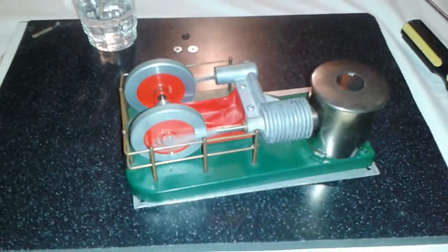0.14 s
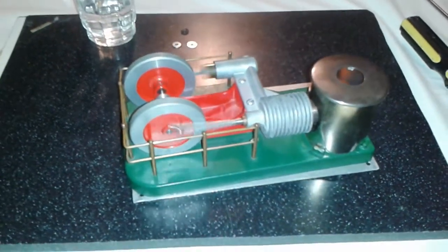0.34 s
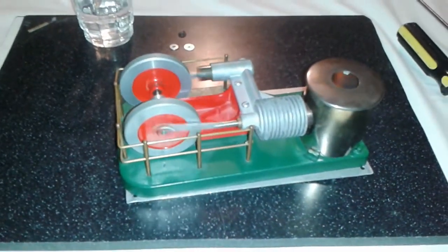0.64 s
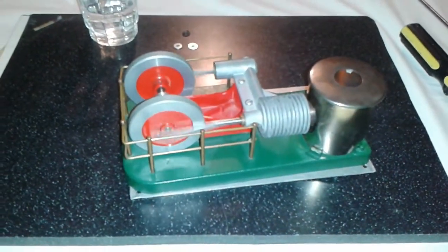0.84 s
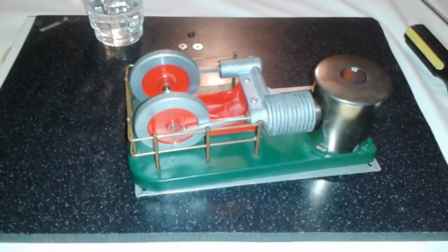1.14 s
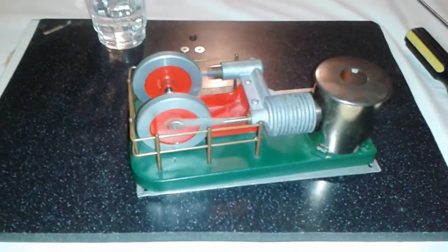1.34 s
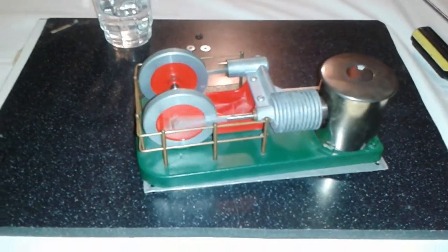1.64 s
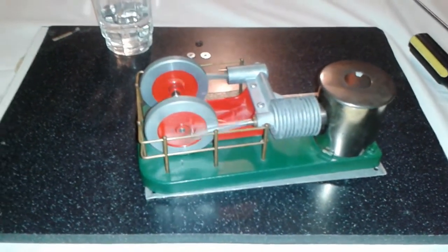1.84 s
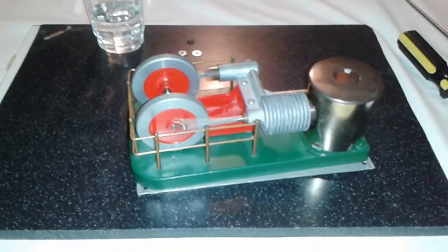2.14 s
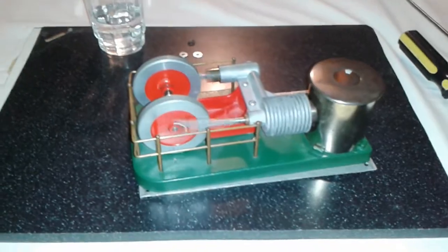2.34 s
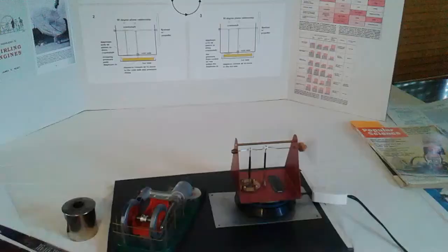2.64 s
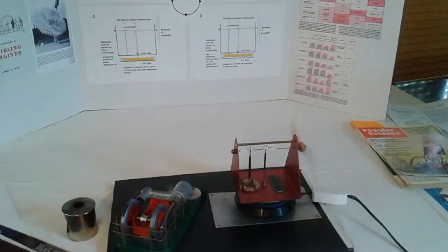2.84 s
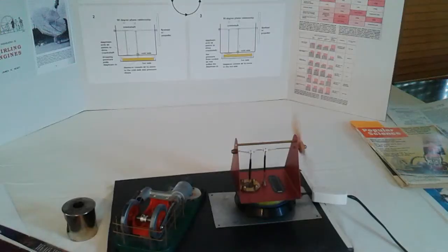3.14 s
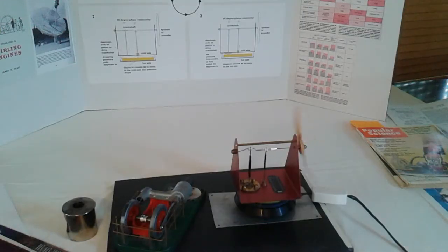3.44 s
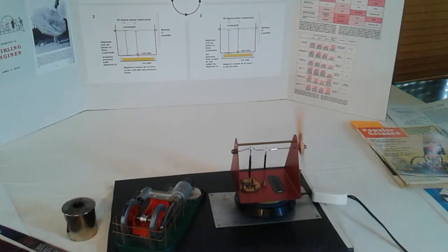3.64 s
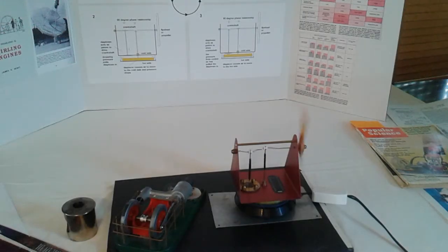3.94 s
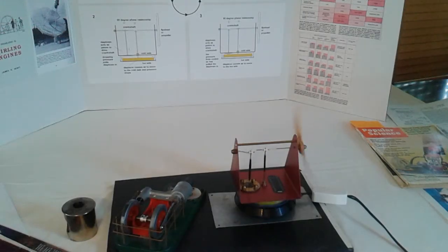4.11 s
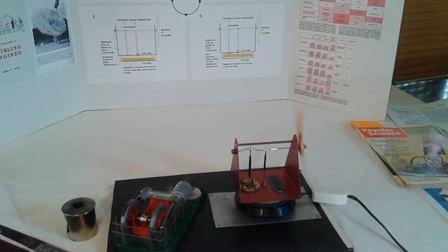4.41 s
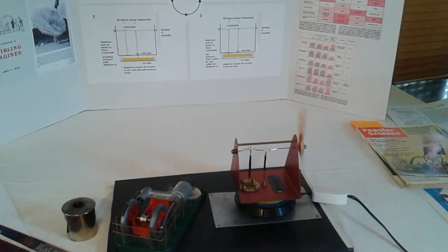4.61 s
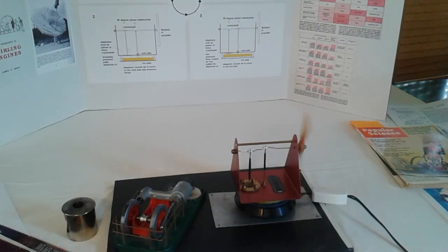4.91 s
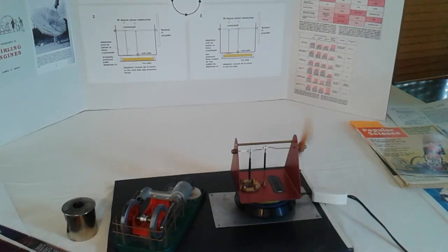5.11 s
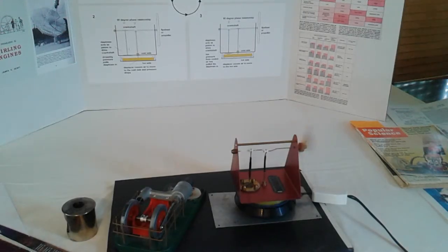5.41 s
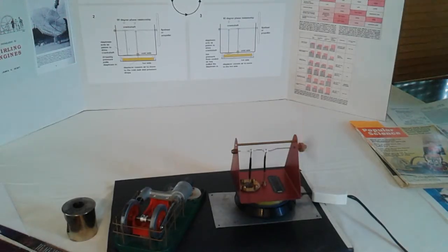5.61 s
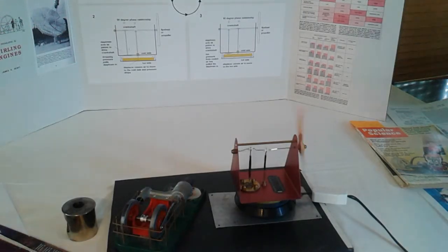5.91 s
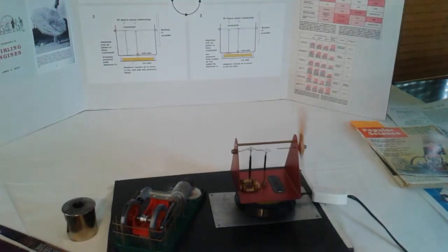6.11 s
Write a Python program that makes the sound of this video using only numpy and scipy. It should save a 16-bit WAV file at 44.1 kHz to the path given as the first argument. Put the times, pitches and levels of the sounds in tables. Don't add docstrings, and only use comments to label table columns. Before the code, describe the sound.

A small hot-air engine runs right beside a handheld camera, its slack metal links making a fast, dry, even clatter over boomy room noise. It cuts off abruptly into brief total silence. Then a toy motor with a spinning rotor rattles a little farther away, slower, looser and scratchier, over softer hiss, with faint hand bumps on the camera.

```python
import sys
import numpy as np
from scipy import signal
from scipy.io import wavfile
from scipy.ndimage import uniform_filter1d

SR = 44100
rng = np.random.default_rng(int(sys.argv[2]) if len(sys.argv) > 2 else 0)


def file_out(sig):
    cols = np.atleast_2d(sig).T
    lim = np.clip(cols, -1, 1)
    pcm = np.round(lim * 32767).astype(np.int16)
    wavfile.write(sys.argv[1], SR, pcm)


def linear_from_db(decibels):
    return 10 ** (np.asarray(decibels, float) / 20)


N = 276063
CUT_S = 3.0

# ring time t60 in seconds, left over right in dB.
ENGINE_MODES = [(0.039, 3.5), (0.074, 2.5), (0.047, -4.5), (0.051, 2), (0.01, -3.5), (0.0045, 7),
                (0.022, -12), (0.024, 5), (0.0099, 6), (0.01, -4.5), (0.0045, -4.5), (0.012, 7.5),
                (0.0034, 5), (0.056, -4.5), (0.0025, 7), (0.011, 11), (0.0058, 14.5), (0.0027, 14),
                (0.0032, 12), (0.0029, -4), (0.067, 2.2), (0.022, 4.5), (0.0065, 8.5)]
ENGINE_HZ = [460, 600, 660, 740, 920, 1300, 1630, 1950, 2520, 2860, 3650, 4650, 5600, 6110, 6800, 7910,
             8620, 9350, 10200, 11300, 12500, 13300, 14400]
ENGINE_LEAD = [0, 0, 0, 0, 0, .2, .2, .1, .3, .5, -2.5, .4, 1.2, -1.5, 1.5, 1.4, 2.8, -1.5, .3, -.5, -.3, 1,
               1.5]
ENGINE_RINGS = [
    [-28.5, -7.5, -9.5, -6, -5, 3.5, -16, 2, -8, -12.5, -2, -37.5, -15, -22, 10.5, -1.5, 6.5, -10.5, -22,
     -37.5, -35, -36, -27],
    [-27, -13.5, -21.5, -16, 1.5, 2.9, -8, -4, 4.5, -0.5, 1, -18, 1.5, -20.5, 4.5, -8, -1, 4, 2.5, -34,
     -28.5, -27.5, -17],
    [-4.5, -23.5, -5.5, -11.5, -9, -7, -21, -41, -27.5, -2, -21.5, -22, -18, -16, -30, -8.5, -4.5, -19.5,
     -14.5, -24, -32.5, -34.5, -25],
    [-12, -11, -6.5, -6.5, 0, 5.5, -3, 6.5, -16.5, -20.5, -10.5, -24, -20.5, -27, 0.5, -21, 3.5, -32.5, -15,
     -25, -37.5, -30, -22],
    [-17.5, -18, -5, -11, -2, -10.5, -15, -3, -1.5, 1, 1, -5.5, -7.5, -0.5, -0.5, -7, -42, -31, -21, -20.5,
     -35.5, -34.5, -32],
]
# length in seconds, decay in dB, first blow in dB, share of it spent rising.
ENGINE_CHATTER = [
    (.004, 8, -2, .4),
    (.0022, 14, 1, .3),
    (.004, 16, 5, .15),
    (.0035, 12, 2, .25),
    (.005, 12, 4, .15),
]
# turns done, time in seconds.
FLYWHEEL = [(-1, -.0226), (10, .8297), (20, 1.6043), (25, 1.9924), (30, 2.381), (35, 2.7704)]
# lag in the turn in seconds, treble blow in dB, its spread in dB,
# base-plate blow in dB, its spread in dB.
ENGINE_KNOCKS = [
    (0.0001, -25, -4, -24, 1.4),
    (.0061, -8.5, -0.14, -26, 1.6),
    (.0137, -11, 1.8, -32, 2.5),
    (.0335, -9.5, 1.24, -29, -1.4),
    (0.0539, -35, 7, -33, 1.5),
]
# time in seconds, extra level in dB.
ENGINE_ODD = [(.1474, 4), (.2099, 0), (0.3017, 10.5), (0.3386, 5), (.4173, 1.5), (0.4428, 6.5),
              (.5331, 3.5), (.6106, 5), (.688, 5), (.7087, -6.5), (.7262, 5.5), (.8297, -1.5),
              (0.9202, -1.5), (1.1526, 6), (1.2928, 6), (1.3079, 2), (1.0755, 1), (1.385, 8), (1.6957, 4.5),
              (1.849, -1), (1.9143, 3.5), (2.0075, -3), (2.1612, 2.5), (2.1998, 2), (2.318, 6.5),
              (2.4735, -2), (2.5502, 2)]
# time in seconds, level in dB.
ENGINE_DRIVE = [
    (0, 1.5),
    (1.4, 2.23),
    (2.8, 2.86),
]


def engine():
    span = (0, CUT_S)
    knocks = knocks_of(FLYWHEEL, ENGINE_KNOCKS, ENGINE_ODD, ENGINE_DRIVE, slack_s=.0003, span=span)
    return linear_from_db(1.5) * clatter(
        knocks, ENGINE_HZ, ENGINE_MODES, ENGINE_LEAD, ENGINE_RINGS, ENGINE_CHATTER,
        count=10, alike=.96, apart_hz=12000, rub_db=-60.0, rub_tilt_db=4.5, span=span,
        uneven_db=1.5, early_s=.0008, longest_s=.085, shiver_db_per_s=600, grit_db=6)


# ring time t60 in seconds, left over right in dB.
MOTOR_MODES = [(0.066, -1), (0.05, -4), (0.052, 4.8), (0.022, -7.5), (0.014, 2.6), (0.0068, -3), (0.012, 9),
               (0.0078, -27), (0.0053, 5.5), (0.0035, -1.5), (0.0051, -1), (0.0044, 7), (0.0014, -3),
               (0.0037, -6), (0.0079, 7), (0.021, 15.5), (0.0035, 16.5), (0.0038, 21), (0.011, 5),
               (0.002, 5.5), (0.0054, -3)]
MOTOR_HZ = [339, 410, 590, 735, 975, 1220, 1580, 1800, 2260, 2740, 3540, 4500, 5500, 6700, 7600, 8000, 8600,
            9600, 10700, 12000, 13600]
MOTOR_RINGS = [
    [-4, -22, -2, -11, 3, 6.5, -0.5, -12, 1.5, 8.8, 2, -9.5, 7.5, -0.5, -15, -9.5, -5, -13.5, -16, -6, -18],
    [-9.5, 3, -4, 7, 13, 22, 9, -1.5, 15, 19, -9, -17, -1.5, -22, -1, -12, -2.5, -9.5, -8, -17, -25],
    [-12.5, -11, -9.5, -8, -4, 0.5, -5, -10.5, 0.61, 1.7, 2, -8.5, 9, -1, -2.5, -8.5, 0, -7.5, -12.5, -1,
     -22],
]
# length in seconds, decay in dB, first blow in dB, share of it spent rising.
MOTOR_CHATTER = [
    (.04, 20, 8, .05),
    (.04, 14, 17, .05),
    (.06, 22, 2, .08),
    (.04, 8, 0, .5),
]
# turns done, time in seconds.
ROTOR = [
    (-1, 3.0416),
    (16, 6.2695),
]
# lag in the turn in seconds, treble blow in dB, its spread in dB,
# base-plate blow in dB, its spread in dB.
MOTOR_KNOCKS = [
    (0.0001, -36, 0.26, -45, 0.38),
    (0.041, -37.5, 0.54, -67, 1.3),
    (0.0881, -38, .8, -40, 1.2),
    (.048, -52, 1.1, -46, 0.37),
]
# time in seconds, extra level in dB.
MOTOR_ODD = [(3.1294, -12.5), (3.2722, 1.5), (3.4633, -3.5), (3.6524, 5), (4.7923, 1.5), (4.08, 4.5),
             (4.2228, -4), (4.268, 3), (5.0295, 4), (5.1312, -5.5), (5.3613, -3.5), (5.5964, 1.5),
             (5.7398, -3.5)]
# time in seconds, level in dB.
MOTOR_DRIVE = [
    (3.1, -1),
    (3.7, -0.5),
    (4.4, 1.6),
    (5.2, 0.93),
    (6.26, 1.4),
]


def motor():
    span = (CUT_S, N / SR)
    knocks = knocks_of(ROTOR, MOTOR_KNOCKS, MOTOR_ODD, MOTOR_DRIVE, slack_s=.0008, span=span)
    rings = MOTOR_RINGS + MOTOR_RINGS[2:]
    return linear_from_db(10.0) * clatter(
        knocks, MOTOR_HZ, MOTOR_MODES, np.zeros(len(MOTOR_HZ)), rings, MOTOR_CHATTER,
        count=250, alike=.65, apart_hz=2140, rub_db=-94.0, rub_tilt_db=-1.0, span=span,
        uneven_db=4, early_s=.003, longest_s=.09, shiver_db_per_s=200, grit_db=3.5)


def knocks_of(shaft, habits, odd, drive, slack_s, span):
    turns, passed = np.transpose(shaft)
    turn_s = np.interp(np.arange(turns[0], turns[-1] + 1), turns, passed)
    lag, treble_db, treble_spread, plate_db, plate_spread = np.transpose(habits)[..., None]
    slip, bright, deep = rng.standard_normal((len(turn_s), len(habits), 3)).T
    s = turn_s + lag + slack_s * slip
    extra_db = np.zeros(s.shape)
    for when, db in odd:
        nearest = np.unravel_index(abs(turn_s + lag - when).argmin(), s.shape)
        s[nearest], extra_db[nearest], bright[nearest] = when, db, 0
    force_db = np.interp(s, *np.transpose(drive))
    treble = treble_db + force_db + extra_db + treble_spread * bright
    plate = plate_db + force_db + .5 * extra_db + plate_spread * deep
    rows = np.stack([s, treble, plate], -1)
    return [joint[(joint[:, 0] > span[0]) & (joint[:, 0] < span[1])] for joint in rows]


def complex_noise(*shape):
    return (rng.standard_normal(shape) + 1j * rng.standard_normal(shape)) / np.sqrt(2)


def bounces(s, chatter, count, share, uneven_db, early_s):
    length, decay_db, first_db, rise = chatter
    habit = rng.random(count)
    late = abs(habit + (1 - share) * rng.uniform(-0.54, .5, (len(s), count)))
    late[:, 0] = abs(rise)
    size = linear_from_db(-decay_db * late + uneven_db * rng.standard_normal(late.shape))
    size = size * np.minimum(late / abs(rise), 1)
    size = np.where(np.arange(count) > 0, size, linear_from_db(first_db)) / np.sqrt(count)
    return s[:, None] - early_s + length * late, size


def shivering(drive, shiver_db_per_s, grit_db):
    power = abs(drive[:, 0]).mean(0) ** 2
    shaken = signal.lfilter([1], [1, -linear_from_db(-shiver_db_per_s / SR)], power)
    wander = uniform_filter1d(rng.standard_normal(len(power)), size=25) * 4.07
    return linear_from_db(grit_db * wander) * np.sqrt(shaken / shaken.mean())


def clatter(knocks, hz, modes, lead, rings, chatter, count, alike, apart_hz, rub_db, rub_tilt_db, span,
            uneven_db, early_s, longest_s, shiver_db_per_s, grit_db):
    plate_top_hz = 3200
    hz, (t60, balance_db) = np.array(hz), np.transpose(modes)
    start, stop = (round(s * SR) for s in span)
    length = stop - start
    drive = np.zeros((len(hz), 2, length), np.complex64)
    apart = np.clip(hz / apart_hz, 0, 1)[:, None, None]
    share = np.clip(alike, 0, 1)
    for rows, ring_db, joint_chatter in zip(knocks, rings, chatter):
        s, treble_db, plate_db = np.transpose(rows)
        touch_s, size = bounces(s, joint_chatter, count, share, uneven_db, early_s)
        blow_db = np.where(hz[:, None] < plate_top_hz, plate_db, treble_db)
        blow = linear_from_db(blow_db + np.array(ring_db)[:, None])
        spot = np.exp(2j * np.pi * rng.random((len(hz), 1, count)))
        left, other = complex_noise(len(s), count, len(hz), 2).T.swapaxes(2, 3)
        left = share * spot + np.sqrt(1 - share ** 2) * left
        right = np.sqrt(1 - apart ** 2) * left + apart * other
        at = np.clip(np.round(touch_s * SR).astype(int) - start, 0, length - 1)
        force = (blow[..., None] * size)[:, None]
        np.add.at(drive, (slice(None), slice(None), at), np.stack([left, right], 1) * force)
    shiver = shivering(drive, shiver_db_per_s, grit_db)
    rub = linear_from_db(rub_db + np.mean(rings, 0) + rub_tilt_db * np.log2(hz / 2000))
    out = np.zeros((2, N))
    for k in range(len(hz)):
        left, other = rng.standard_normal((2, length))
        rubbed = np.array([left, np.sqrt(1 - apart[k, 0] ** 2) * left + apart[k, 0] * other])
        turn = np.exp(2j * np.pi * hz[k] / SR)
        soft = np.exp(-hz[k] / (SR * .9))
        decay = linear_from_db(-60 / (np.clip(t60[k], 1e-3, longest_s) * SR))
        poles = np.poly([turn * decay, turn * soft])
        rung = signal.lfilter([1 - soft], poles, drive[k] + rub[k] * shiver * rubbed)
        ports = linear_from_db([[balance_db[k] / 2], [-balance_db[k] / 2]]) * np.exp([[1j * lead[k]], [0]])
        out[:, start:stop] += (ports * rung).real
    return out


# start in seconds, level in dB, pitch in Hz, length in seconds.
BUMPS = [
    (2.419, -45.5, 192, 0.13),
    (4.052, -58.5, 153, 0.16),
    (4.19, -52, 160, 0.11),
    (4.3, -67, 113, 0.26),
    (6.094, -57, 186, 0.057),
    (6.107, -47.5, 131, 0.13),
    (6.087, -56, 576, 0.15),
]


def bumps():
    out = np.zeros(N)
    u = np.arange(1500) / SR
    for s, db, hz, length in BUMPS:
        t = np.arange(round(length * SR)) / SR
        shell = u * np.exp(-np.pi * 90 * u) * np.cos(2 * np.pi * hz * u)
        thud = signal.fftconvolve(rng.standard_normal(SR // 2), shell - shell.mean(), "same")[:len(t)]
        thud = linear_from_db(db) * thud / thud.std() * np.sin(np.pi * t / length)
        part = out[round(s * SR):][:len(t)]
        part += thud[:len(part)]
    return out


def read(points, hz):
    f, value = np.transpose(points)
    return np.interp(np.log(hz + 1), np.log(f + 1), value)


# frequency in Hz, likeness from -1 to 1.
SAME = [
    (60, .55),
    (300, .75),
    (700, .93),
    (1400, .4),
    (3000, .1),
    (15000, .05),
]


def two_ports(left, other, hz):
    same = np.clip(read(SAME, hz), -1, 1)[:, None]
    return np.array([left, same * left + np.sqrt(1 - same ** 2) * other])


# frequency in Hz, t60 in seconds.
ROOM = [
    (300, 0.04),
    (1500, 0.093),
    (5000, 0.19),
    (12000, 0.02),
]


def room(x):
    taps = np.zeros((2, SR // 2))
    at = np.arange(100, SR // 2 - 20, 20) + rng.integers(0, 20, (2, (SR // 2 - 101) // 20))
    np.put_along_axis(taps, at, rng.choice([-1., 1.], at.shape), 1)
    hz, t, (left, other) = signal.stft(taps, SR, nperseg=256)
    fade = linear_from_db(-60 * t / read(ROOM, hz)[:, None])
    tail = signal.istft(two_ports(left, other, hz) * fade, SR, nperseg=256)[1]
    return signal.fftconvolve(x, tail / np.linalg.norm(tail[0]), axes=1)[:, :N]


# frequency in Hz, level in dB per Hz.
HUSH = [
    (12, -40),
    (20, -0.5),
    (252, -3),
    (341, -8.5),
    (487, -21),
    (591, 3.5),
    (845, -11),
    (4530, -15.5),
    (8080, -9.5),
    (14400, -22.5),
]


def hush():
    hz, t = np.fft.rfftfreq(1024, 1 / SR), np.arange(N // 256 + 5) * 256 / SR
    left, other = complex_noise(len(t), len(hz), 2).T
    near_db = (t < CUT_S) * read([(40, 5.1), (300, 12.8), (2000, 4.05)], hz)[:, None]
    z = two_ports(left.T, other.T, hz) if left.shape[0] != len(hz) else two_ports(left, other, hz)
    z = z * linear_from_db(read(HUSH, hz)[:, None] + near_db)
    return linear_from_db(-64.5) * signal.istft(z, nperseg=1024, noverlap=768)[1][:, :N]


def scene():
    near, far = engine(), motor()
    echoes = room(linear_from_db(-15.5) * near + linear_from_db(-7.0) * far)
    return near + far + echoes + hush() + bumps()


def thinned(x):
    margin_db = [(3000, -45), (4500, -18), (7500, -34), (11000, -26), (13000, -20), (14700, -14), (16000, -12)]
    hz, t, z = signal.stft(x, SR, nperseg=512, noverlap=384)
    power = abs(z) ** 2
    patch = uniform_filter1d(uniform_filter1d(power, size=9, axis=1), size=5, axis=2)
    loud = uniform_filter1d(power.mean(1, keepdims=True), size=40, axis=2)
    short_db = 6 * rng.standard_normal((len(t) // 8 + 1, len(hz) // 8 + 1, 2)).T
    short_db = short_db.repeat(8, axis=1).repeat(8, axis=2)[:, :len(hz), :len(t)]
    loud = loud * linear_from_db(short_db)
    over = patch / (loud + 1e-20) / linear_from_db(2 * read(margin_db, hz))[:, None]
    keep = np.clip(over ** 3, 0, 1)
    return signal.istft(z * keep, SR, nperseg=512, noverlap=384)[1][:, :N]


def low_pass(x):
    return signal.sosfilt(signal.butter(12, 16480, fs=SR, output="sos"), x)


# time in seconds, gain in dB.
EDIT = [
    (2.762, 0),
    (2.765, -22),
    (2.78, -47),
    (2.83, -62),
    (2.84, -140),
    (3.1, -140),
    (3.116, -20),
    (3.13, 0),
]


def record(dry):
    limited = .72 * np.tanh(dry / .72)
    banded = signal.sosfilt(signal.butter(10, 14750, fs=SR, output="sos"), limited)
    banded = signal.sosfilt(signal.butter(2, 45, "high", fs=SR, output="sos"), banded)
    s, db = np.transpose(EDIT)
    edited = thinned(banded) * linear_from_db(np.interp(np.arange(N) / SR, s, db))
    return low_pass(edited)


dry = scene()
out = record(dry)
file_out(out)
```